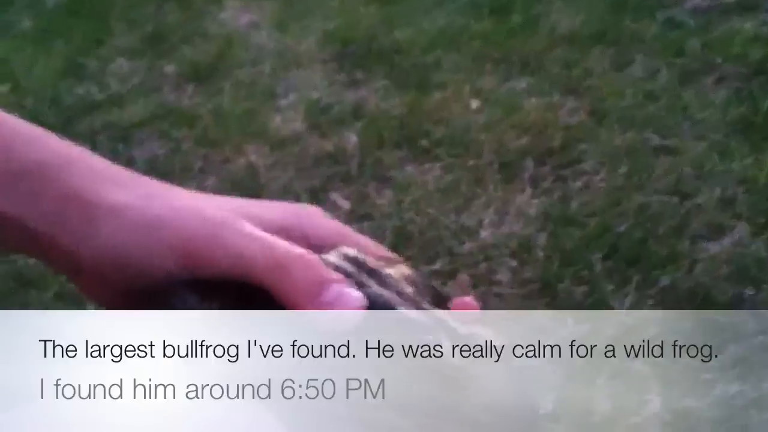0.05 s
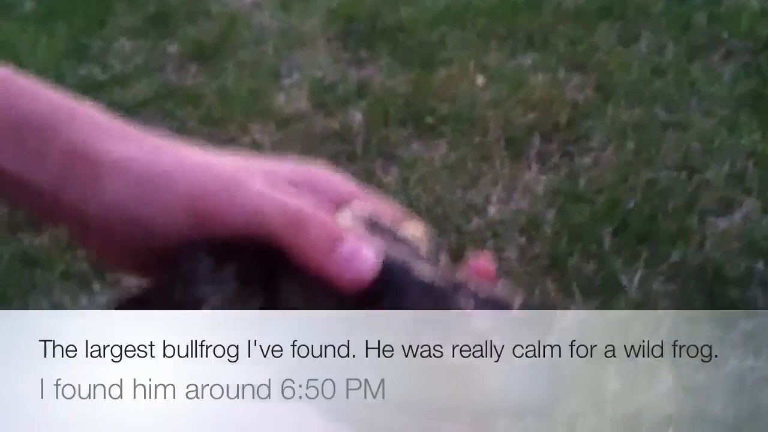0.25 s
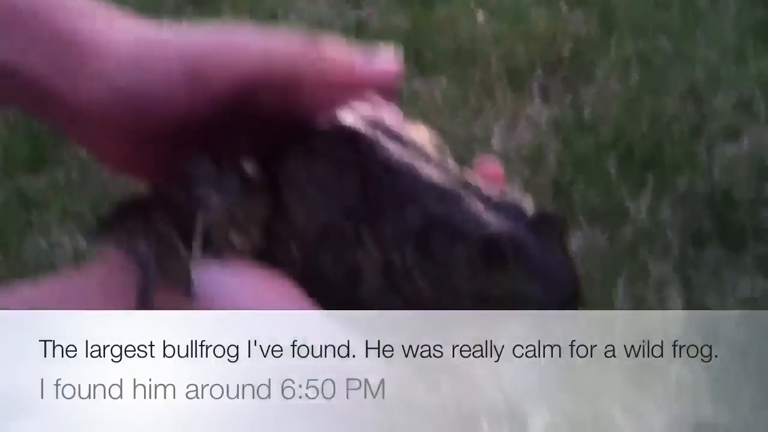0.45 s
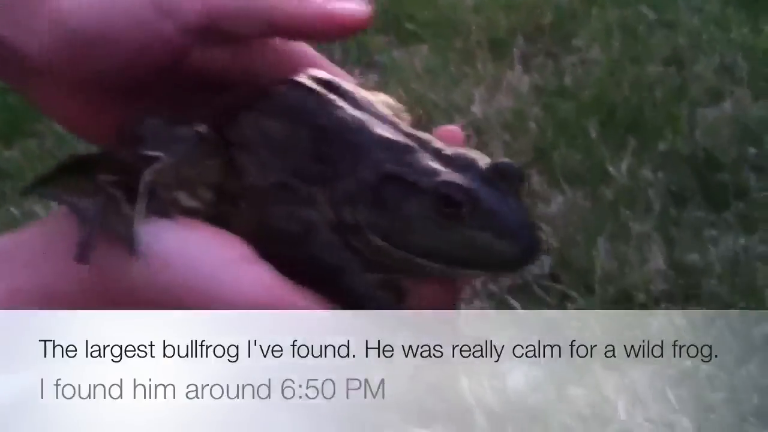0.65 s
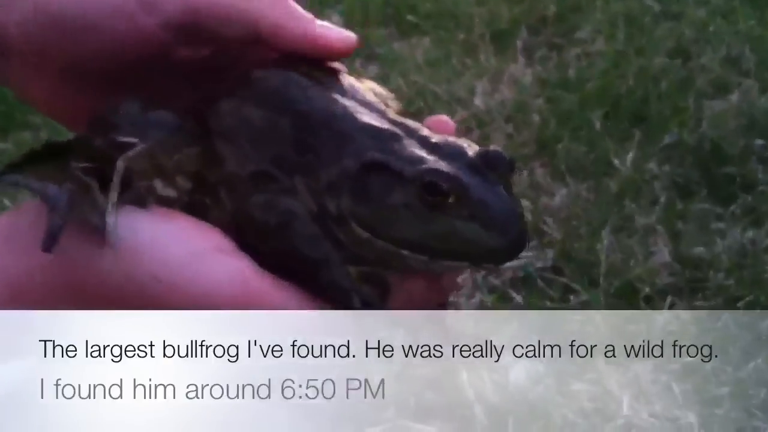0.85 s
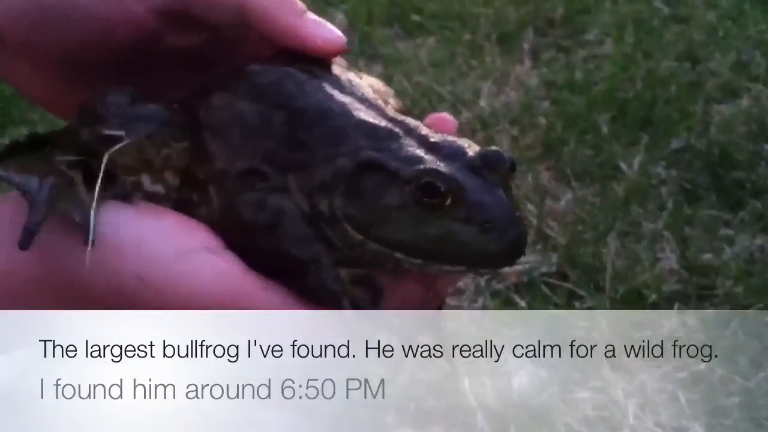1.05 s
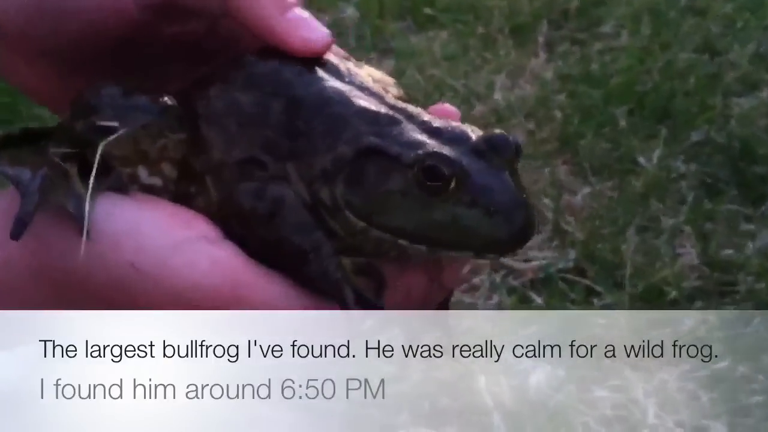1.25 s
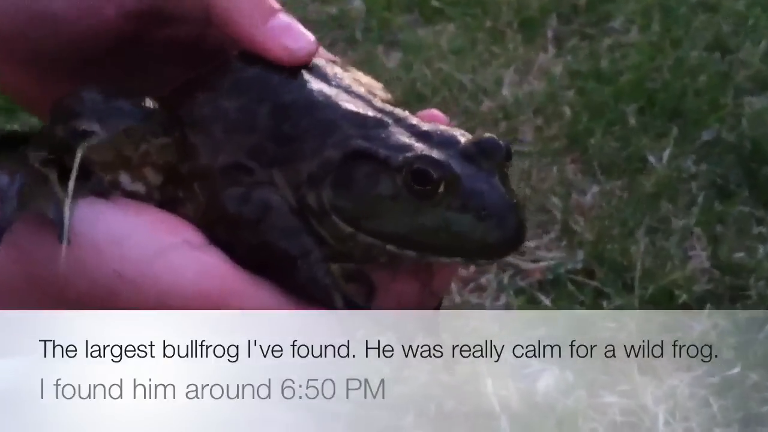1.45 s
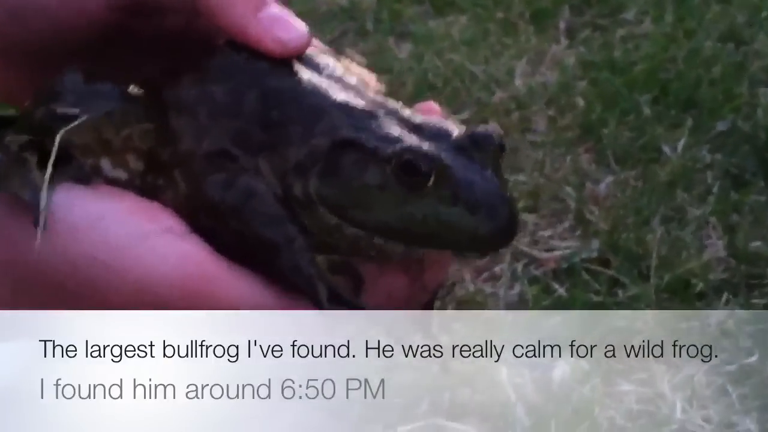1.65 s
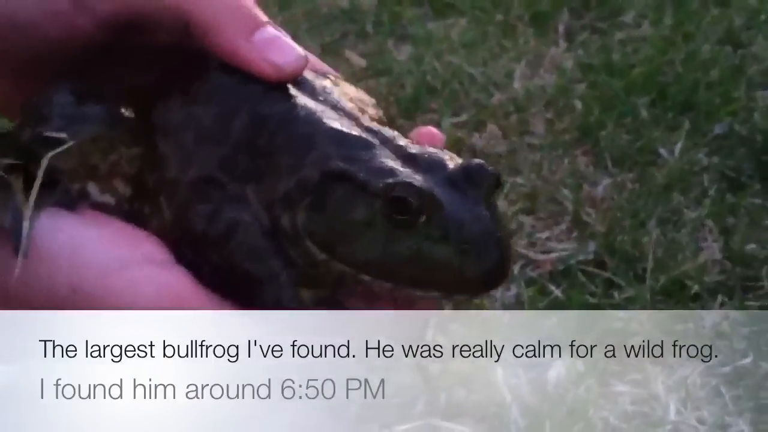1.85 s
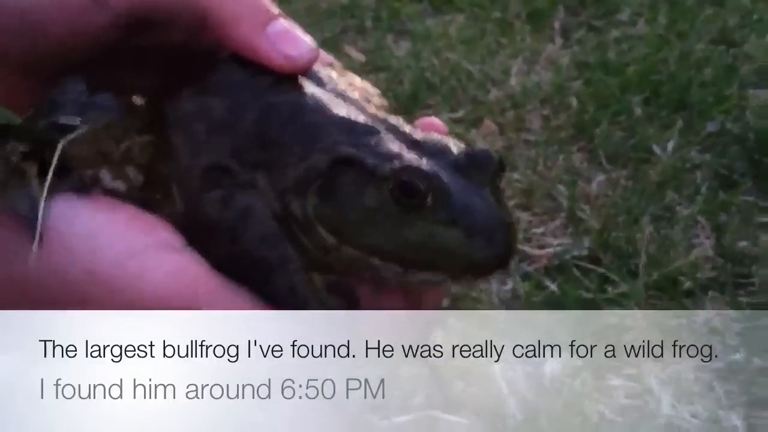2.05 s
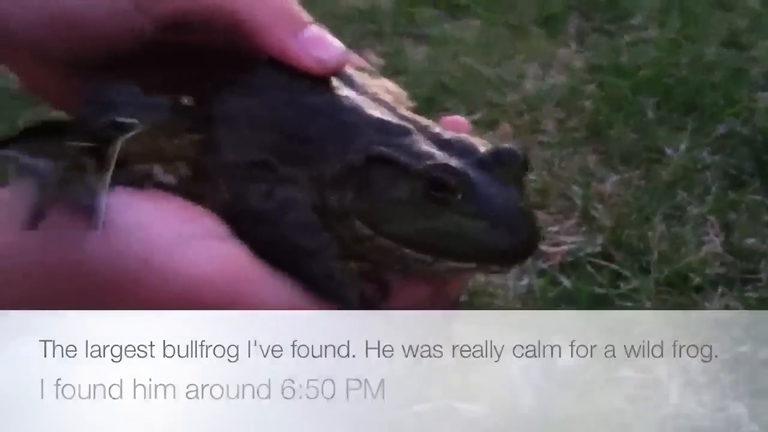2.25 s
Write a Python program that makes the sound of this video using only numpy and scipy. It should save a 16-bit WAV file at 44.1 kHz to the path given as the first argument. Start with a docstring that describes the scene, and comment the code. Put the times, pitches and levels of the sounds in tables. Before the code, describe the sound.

Soft low bumps and an uneven rumble come from a hand gripping the camera, over a quiet, steady outdoor hiss. The strongest bump lands at about 0.5 seconds, with smaller clusters around 1.1, 1.4 and 1.9 seconds. Fingers and grass tick and rustle faintly throughout. One short rising chirp, probably a bird, sounds at 1.6 seconds, and a faint, brief rising hum follows at 2 seconds.

```python
"""Soft low bumps and an uneven rumble, sent into the microphone by a hand gripping a camera.
The camera is on a quiet lawn, where a frog is held up in front of it and stays silent.
Fingers and grass tick and rustle faintly. One short rising chirp, probably a bird, stands out,
and a faint hum follows near the end. A steady outdoor hiss lies under everything."""
import sys
import numpy as np
from scipy import signal
from scipy.fft import rfft, irfft, next_fast_len
from scipy.io import wavfile
from scipy.ndimage import uniform_filter1d, map_coordinates

SR = 44100
rng = np.random.default_rng(int(sys.argv[2]) if len(sys.argv) > 2 else 0)


def store_wav(level_fs):
    """Save 16-bit WAV to argv[1]."""
    pcm = np.round(np.clip(np.atleast_2d(level_fs), -1, 1) * 32767)
    wavfile.write(sys.argv[1], SR, pcm.T.astype(np.int16))


N = 101429


def handling():
    """Each bump of the grip swings the camera body a few times; the shifting grip rumbles in between."""
    # Each row: time of the peak in seconds, level in dB before the boost, pitch at the peak in Hz.
    bumps = [(0.018, -45.5, 160), (.055, -47.5, 178), (.176, -45, 149), (0.197, -49, 137),
             (0.223, -47, 162), (.238, -38.5, 170), (.254, -37.5, 168), (.267, -35, 190), (.472, -24, 186),
             (0.488, -36.5, 208), (.498, -41.5, 199), (.508, -37.5, 152), (.535, -49, 150),
             (.6, -38.5, 161), (0.616, -47, 150), (.635, -35, 174), (.646, -45.5, 208), (0.671, -55, 140),
             (0.726, -41, 161), (.75, -48, 149), (0.777, -43, 165), (0.835, -45, 153), (.871, -51, 156),
             (.888, -48.5, 150), (0.91, -47.5, 167), (0.994, -45, 132), (1.017, -42.5, 189),
             (1.031, -39, 151), (1.069, -31.5, 177), (1.106, -43, 159), (1.171, -42, 152),
             (1.198, -42.5, 154), (1.279, -43, 170), (1.312, -35.5, 171), (1.375, -43, 163),
             (1.389, -38, 145), (1.4, -39.5, 169), (1.862, -43.5, 156), (1.889, -44.5, 160),
             (1.904, -34.5, 164), (1.924, -38.5, 149), (1.938, -43, 148), (1.983, -41.5, 180),
             (2.002, -43, 156), (2.045, -43, 152), (2.129, -48, 187), (2.143, -49, 110)]
    # Each row: time in seconds, level of the rumble in dB.
    rumble_levels = [(0, -51), (.1, -60), (.23, -50.5), (.32, -66), (.44, -58), (.49, -45.5), (.56, -70),
                     (.63, -57.5), (.75, -50), (.81, -64), (.86, -46.5), (.95, -70), (1.01, -48),
                     (1.06, -44), (1.13, -59), (1.2, -51), (1.39, -55.5), (1.5, -60.5), (1.8, -60),
                     (1.92, -51), (2.14, -56), (2.3, -69)]
    # Each row: frequency in Hz, relative strength of the rumble in dB.
    rumble_colour = [(20, -43), (40, -31), (62, -12.5), (100, -0.5), (135, 4), (195, -1.5), (250, -13),
                     (340, -32.5), (600, -62), (2000, -100)]
    rise_s, fall_s, boost_db = 0.0043, 0.0074, 1.5
    sag_per_s = 25.3  # a bump's pitch sinks by this many times its peak value per second
    sound = amp(curves(rumble_levels)[0]) * coloured(rng.standard_normal(N), rumble_colour)
    for peak_s, db, hz in bumps:
        t = clock() - peak_s
        swell = np.exp(-(t / np.where(t < 0, rise_s, fall_s)) ** 2)
        swing = np.cos(2 * np.pi * hz * t * (1 - sag_per_s * t / 2))
        sound += amp(db + boost_db) * swell * swing
    return sound


def chirp():
    """One short, slightly rough whistle, probably a bird, that rises as it swells and fades."""
    # Each row: time in seconds, pitch in Hz, level in dB.
    chirp_path = [(1.592, 1640, -67), (1.605, 1643, -48), (1.617, 1693, -49), (1.629, 1698, -39.5),
                  (1.637, 1760, -45), (1.645, 1800, -54), (1.652, 1830, -75)]
    return rough_tone(chirp_path)


def ticks():
    """Fingers and grass touch; each contact rings very briefly, its pitch smeared as they slip."""
    # Each row: start in seconds, level in dB before the boost, pitch in Hz, fade rate per second.
    contacts = [(.036, -49.5, 1390, 590), (0.042, -49.5, 2830, 600), (0.073, -53, 1330, 400),
                (0.158, -53, 1350, 400), (.171, -52, 1340, 400), (.174, -48.5, 2440, 700),
                (.184, -52, 1330, 400), (.201, -49, 2900, 900), (.3915, -47, 2300, 800),
                (.393, -50, 1300, 500), (.426, -48, 2420, 800), (.438, -46, 2100, 500),
                (.682, -47.5, 3120, 800), (.789, -50.5, 4270, 1800), (0.9019, -43.5, 2460, 900),
                (.917, -50.5, 567, 350), (.917, -56, 7160, 5000), (.9315, -57, 7950, 6000),
                (1.061, -47.5, 2000, 1000), (1.258, -50.5, 4090, 800), (1.3106, -43.5, 2090, 550),
                (1.336, -49.5, 1800, 500), (1.53, -52, 637, 200), (1.562, -47, 2360, 700),
                (1.575, -51.5, 1610, 200), (1.638, -47.5, 3440, 895), (1.783, -46, 2770, 700),
                (2.074, -50, 1290, 450), (2.133, -47.5, 1210, 600), (2.135, -44.5, 3580, 1600),
                (2.153, -48, 1780, 800), (2.184, -43.5, 1420, 604), (2.213, -46.5, 2170, 600)]
    rise_s, boost_db, slip_radians = 0.00033, 2.5, 0.6
    sound = np.zeros(N)
    for start_s, db, hz, fade_rate in contacts:
        t = np.maximum(clock() - start_s, 0)
        slip = slip_radians * wobble(per_second=1500)
        envelope = np.exp(-fade_rate * t) * (1 - np.exp(-t / rise_s))
        ring = envelope * np.sin(2 * np.pi * hz * t + slip)
        sound += amp(db + boost_db) * ring / np.abs(ring).max()
    return sound


def rustle():
    """Light brushes of skin, each a puff of noise that swells and fades."""
    # Each row: time of the peak in seconds, level in dB.
    brushes = [(.2, -70), (.915, -69), (1.595, -69), (2.132, -74), (2.154, -65), (2.226, -71)]
    # Each row: frequency in Hz, relative strength in dB.
    rustle_colour = [(500, -25), (2000, 13), (4000, 10.5), (6500, 6.5), (12000, -3), (15000, -18)]
    rise_s, fall_s = 0.043, 0.02
    envelope = np.zeros(N)
    for peak_s, db in brushes:
        t = clock() - peak_s
        envelope += amp(db) * np.exp(-np.abs(t) / np.where(t < 0, rise_s, fall_s))
    return envelope * coloured(rng.standard_normal(N), rustle_colour)


def hum():
    """A faint, brief hum that rises in pitch."""
    # Each row: time in seconds, pitch in Hz, level in dB.
    hum_path = [(2.0, 301.7, -75), (2.04, 340.6, -54), (2.075, 375, -61.5), (2.13, 370, -87)]
    return rough_tone(hum_path)


def crackle():
    """A fine crackle of tiny random clicks runs throughout."""
    # Each row: frequency in Hz, relative strength in dB.
    crackle_colour = [(500, -11.5), (1400, -15), (2300, -3), (4000, -3.5), (5200, -18.5), (14000, -46)]
    clicks_per_s, level_db, spread_db = 400, -64, 6
    sizes = amp(spread_db * np.clip(rng.standard_normal(N), -2, 2))
    happens = rng.random(N) < clicks_per_s / SR
    clicks = happens * rng.choice([-1, 1], N) * sizes
    return amp(level_db) * coloured(clicks, crackle_colour)


def outdoors():
    """Steady hiss, a low distant murmur and a far wash of noise that comes and goes."""
    # In these three, each row: frequency in Hz, relative strength in dB.
    hiss_colour = [(260, -17), (450, -0.5), (790, -6), (863, -2), (1030, -2), (1310, 1.5), (1680, -3),
                   (2010, 2.5), (2470, 1.5), (3790, -3), (4330, -7), (5410, -18), (6550, -18.5),
                   (15500, -34.5)]
    murmur_colour = [(20, -36), (40, -31), (65, -1), (130, -3), (230, 3.5), (290, -3), (350, -3),
                     (450, -16), (700, -48), (2000, -74)]
    wash_colour = [(200, -21), (400, -5.5), (900, -5.5), (1300, 2.5), (1700, -3.5), (4000, -32.5)]
    # In these two, each row: time in seconds, level in dB that the sound flutters around.
    hiss_levels = [(0, -60), (.4, -57), (1.4, -57), (2.3, -57)]
    wash_levels = [(0, -61.5), (.4, -63.5), (.65, -70.5), (1.9, -82), (2.15, -65), (2.3, -78)]
    hiss_flutter_db, wash_flutter_db, murmur_db = 0.78, 2.2, -59
    hiss_db = curves(hiss_levels)[0] + hiss_flutter_db * wobble(per_second=40.3)
    hiss = amp(hiss_db) * coloured(patchy(depth_db=1.5), hiss_colour)
    murmur = amp(murmur_db) * coloured(rng.standard_normal(N), murmur_colour)
    wash_db = curves(wash_levels)[0] + wash_flutter_db * wobble(per_second=49.4)
    wash = amp(wash_db) * coloured(rng.standard_normal(N), wash_colour)
    return hiss + murmur + wash


def rough_tone(path, roughness=0.1):
    """One plain tone that follows a path of pitch and level, its loudness trembling a little."""
    hz, db = curves(path)
    sounding = (clock() > path[0][0]) & (clock() < path[-1][0])
    tone = np.sqrt(2) * np.sin(2 * np.pi * np.cumsum(hz) / SR)
    tremble = 1 + roughness * wobble(per_second=400)
    return sounding * amp(db) * tremble * tone


def amp(db):
    """Turn decibels into a multiplier."""
    return 10 ** (np.asarray(db) / 20)


def unit(x):
    """Scale x to an average (rms) size of 1."""
    return x / np.sqrt(np.mean(x ** 2) + 1e-20)


def clock():
    """The time of every sample, in seconds."""
    return np.arange(N) / SR


def curves(rows):
    """Join timed rows with straight lines: one curve for each column after the time."""
    times, *columns = np.transpose(rows)
    return [np.interp(clock(), times, column) for column in columns]


def wobble(per_second):
    """A smooth curve through this many random values a second."""
    values = rng.standard_normal(int(N * per_second / SR) + 4)
    return map_coordinates(values, [clock() * per_second])


def filtered(x, response):
    """Multiply each frequency in x by response(hz)."""
    size = next_fast_len(N + SR // 2)
    hz = np.fft.rfftfreq(size, 1 / SR)
    return irfft(rfft(x, size) * response(hz), size)[:N]


def coloured(x, colour):
    """Shape the lows and highs of x by rows of Hz and dB, then scale it to an average size of 1."""
    row_hz, db = np.transpose(colour)
    return unit(filtered(x, lambda hz: amp(np.interp(np.log(hz + 1), np.log(row_hz + 1), db))))


def patchy(depth_db):
    """White noise with louder and softer patches scattered over pitch and time."""
    spectrum = signal.stft(rng.standard_normal(N), nperseg=512)[2]
    patches = uniform_filter1d(rng.standard_normal(spectrum.shape), size=6, axis=0)  # blur over pitch
    patches = uniform_filter1d(patches, size=8, axis=1)  # blur over time
    return signal.istft(spectrum * amp(depth_db * unit(patches)), nperseg=512)[1][:N]


def scene():
    """Add up everything that reaches the one microphone."""
    return (outdoors() + handling() + ticks() + rustle() + crackle() + chirp() + hum())[None]


def record(dry):
    """The camera adds a faint electronic whine and cuts off the very highest sounds."""
    whine_hz, whine_db, cutoff_hz = 15000, -97, 15650
    whine = np.sqrt(2) * amp(whine_db) * np.sin(2 * np.pi * whine_hz * clock())
    return filtered(dry[0] + whine, lambda hz: hz < cutoff_hz)[None]


dry = scene()
out = record(dry)
store_wav(out)
```